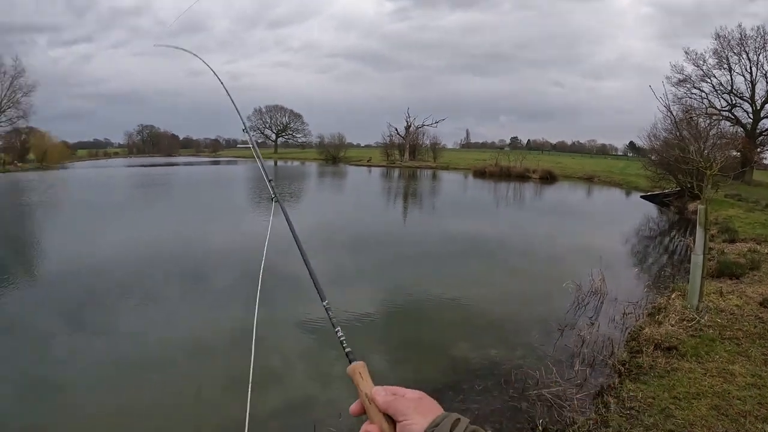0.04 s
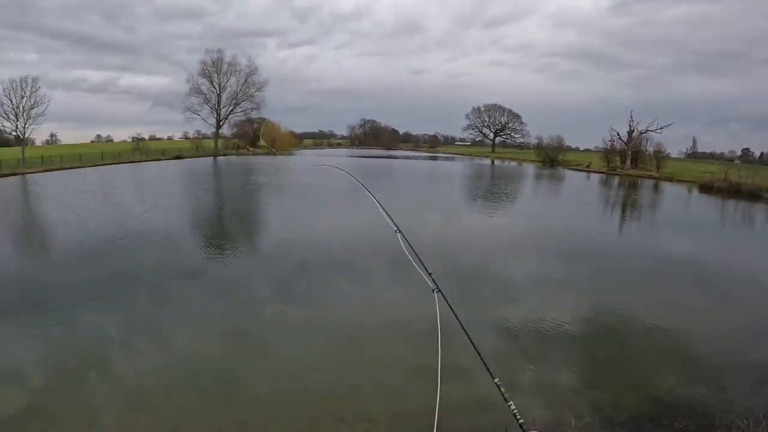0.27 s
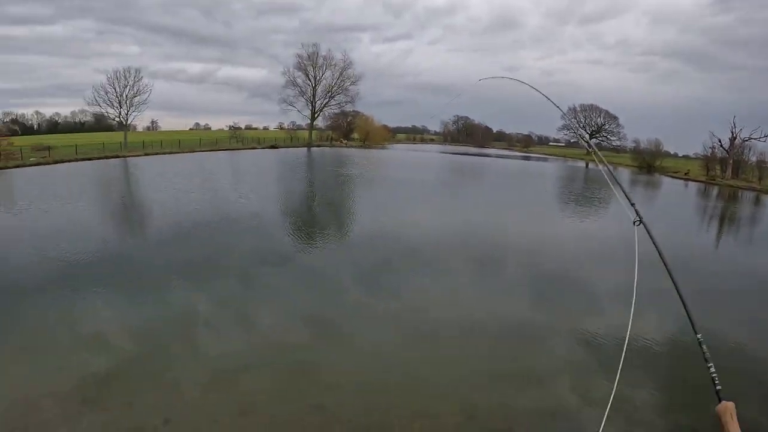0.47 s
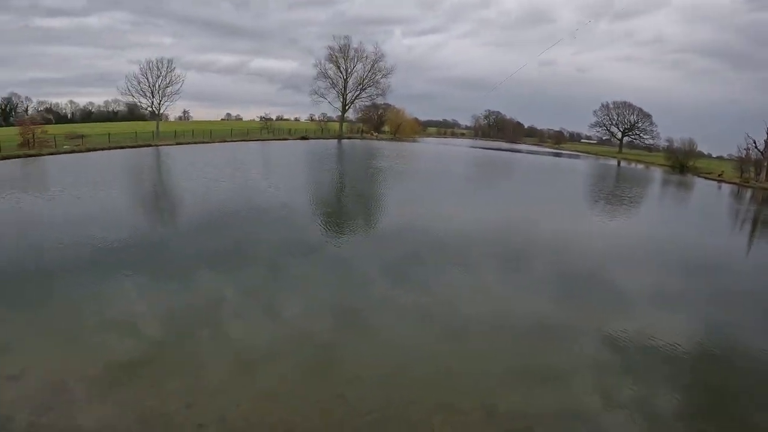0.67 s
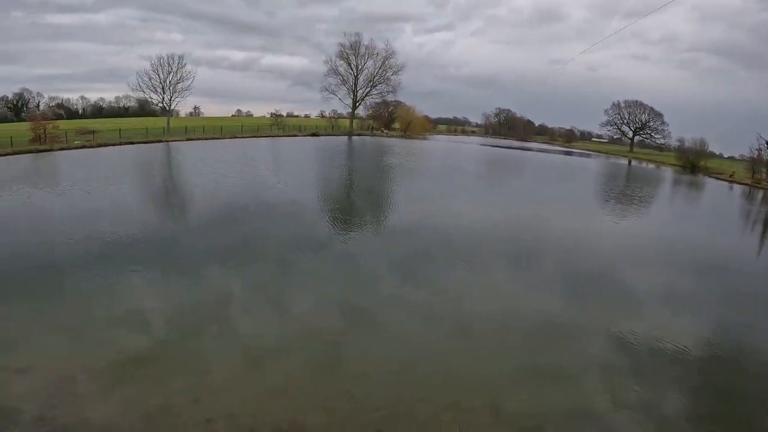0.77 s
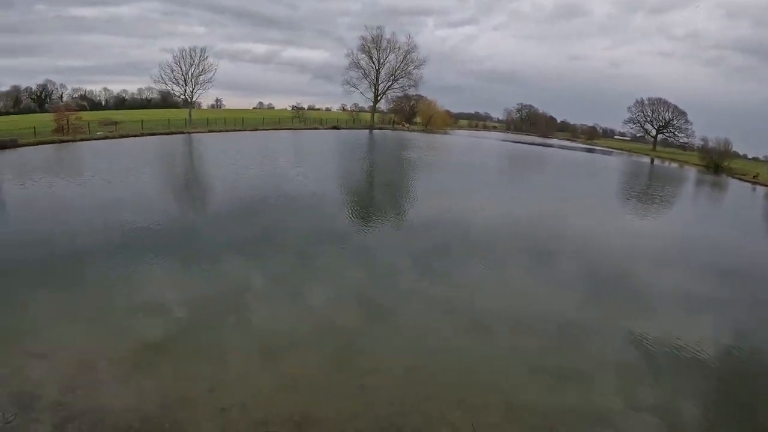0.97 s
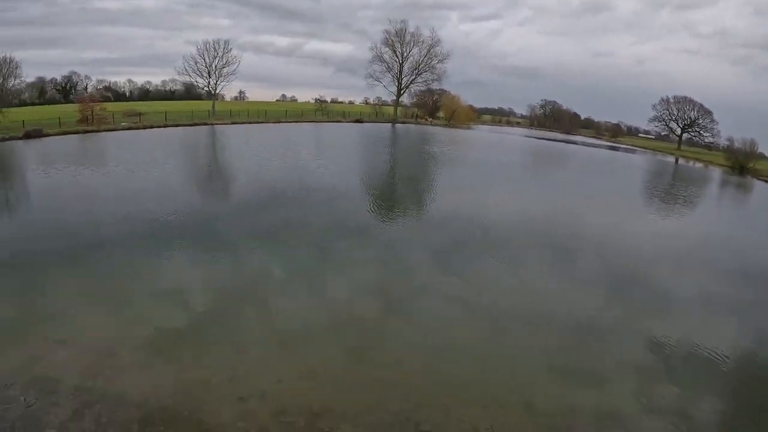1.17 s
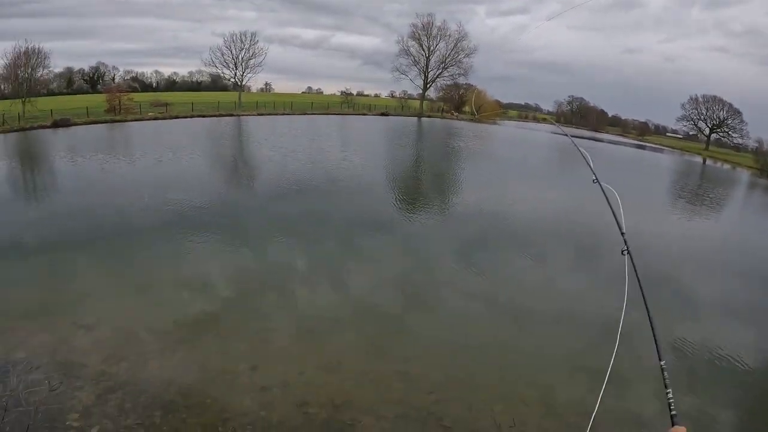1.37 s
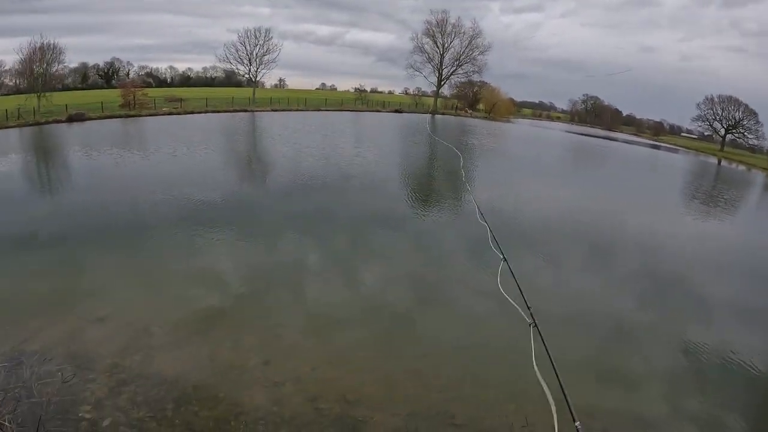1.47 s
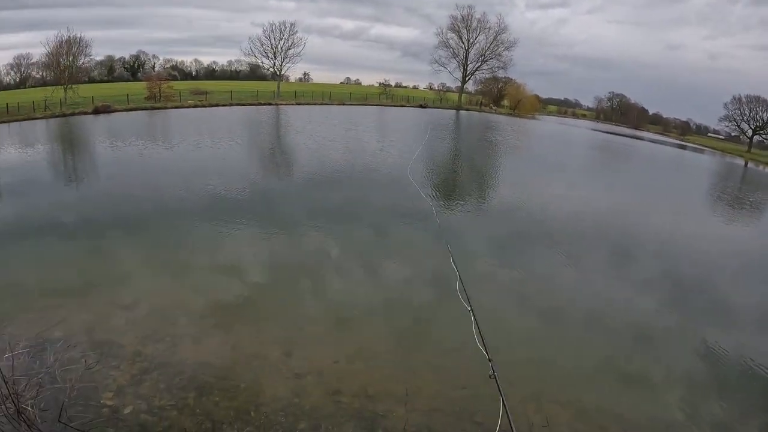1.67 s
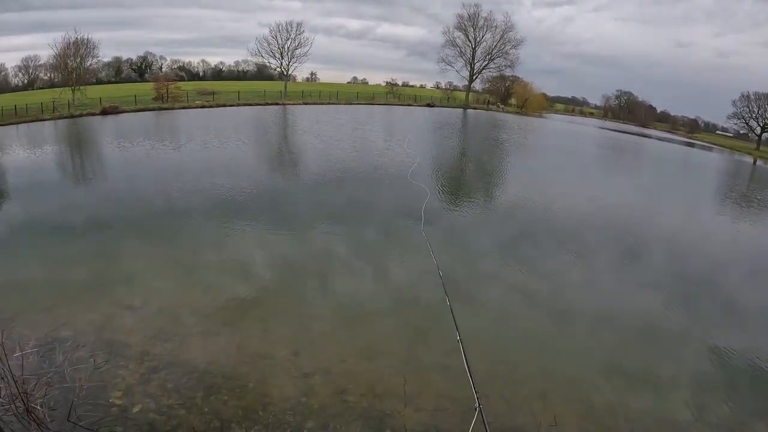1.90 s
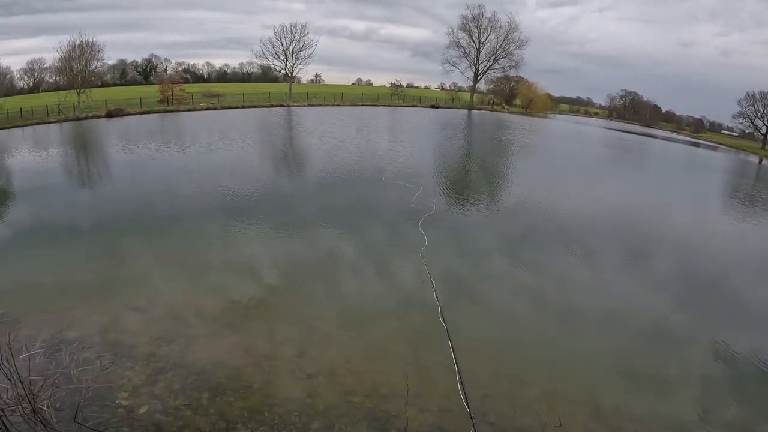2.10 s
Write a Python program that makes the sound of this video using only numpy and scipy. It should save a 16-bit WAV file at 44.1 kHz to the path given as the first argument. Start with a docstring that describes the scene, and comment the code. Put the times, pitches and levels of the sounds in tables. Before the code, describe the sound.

A thin fishing line slides through metal rod guides with a bright hiss, pauses, then shoots out with a raspier rattle. Dull clicks and wind thumps hit the close microphone outdoors, with faint chirps midway.

```python
"""Fly line slides twice through a rod's rings, hissing: smoother on the haul, slapping more on the shoot.
Friction noise and random slaps drive two-pole ring resonances; pressed rings sing alone.
Rod and sleeve swish as shaped noise; knocks on the microphone housing are decaying, sagging tones.
Wind on the port is lumpy low noise plus pressure lurches.
A bird chirps in falling sines over a faint outdoor hiss of banded noise."""
import sys
import numpy as np
from scipy import signal
from scipy.io import wavfile

SR = 44100
rng = np.random.default_rng(int(sys.argv[2]) if len(sys.argv) > 2 else 0)


def to_wav(sig):
    """Store sig (one row per channel, or 1-D mono) as 16-bit WAV at the path in sys.argv[1].

    Samples outside -1..1 are clipped; the rate is SR.
    """
    pcm = np.clip(np.atleast_2d(sig), -1, 1) * 32767
    pcm = np.round(pcm).astype(np.int16)
    wavfile.write(sys.argv[1], SR, pcm.T)  # frames by channels


def field_ratio(decibels):
    """Amplitude ratio for a level in dB (20 dB per decade); scalars and array-likes work."""
    return 10 ** (np.asarray(decibels, dtype=float) / 20)


N = 94506  # samples

# line sliding in the rings: time_s, level_db, tilt_db_per_octave
LINE_SLIDE = [(0.0, -65, -5.5), (0.15, -58.5, 3), (0.36, -58, 3.5), (0.58, -63.5, 7.5), (0.62, -68.5, -1),
              (0.86, -71.5, -2), (0.95, -81.5, -6), (1.05, -73, -7), (1.185, -74.5, 7), (1.215, -63, -11),
              (1.225, -60, 0), (1.32, -65.5, -8.5), (1.345, -57.5, -0.5), (1.54, -54, -3),
              (1.57, -58.5, -0.5), (1.65, -58.5, 4), (1.67, -53.5, 0), (1.72, -60, -4), (1.82, -57.5, 0.5),
              (1.91, -61, -5.5), (1.92, -71.5, -5), (2.05, -79, -4), (2.14, -73, -1)]
# slapping in the contact: time_s, power_share_0_to_1
SLAP_SHARE = [(1.1, .1), (1.3, .3), (1.7, .3), (1.8, .5)]
# ring resonances: centre_hz, width_hz, relative_level_db
RING_MODES = [(2600, 240, -14), (3400, 740, -0.5), (3840, 680, -4), (4740, 880, 2), (5600, 450, -0.5),
              (6130, 330, -6), (6935, 910, 0), (7600, 1800, -5.5), (8300, 370, -11), (9250, 350, -13),
              (9800, 1600, -17.5)]
# line pressing one ring, which sings: start_s, length_s, ring_hz, level_db
RING_PRESSES = [(.1, 0.42, 7040, -70), (0.143, 0.38, 4780, -64.5), (0.37, 0.16, 3400, -70.5),
                (1.37, 0.071, 3400, -60), (1.407, 0.04, 6700, -57.5), (1.431, 0.054, 8300, -60),
                (1.496, 0.025, 7600, -55), (1.572, 0.044, 5100, -56), (1.76, 0.13, 6160, -61.5),
                (1.715, 0.26, 3660, -66)]
# air past rod, arm and housing: time_s, level_db
SWISH_LEVEL = [(0, -56), (.08, -58.5), (.13, -54.5), (.44, -69), (.68, -60.5), (.85, -65), (1.0, -67.5),
               (1.05, -60), (1.15, -61.5), (1.43, -56), (1.78, -55.5), (2.14, -53.5)]
# swish spectrum: frequency_hz, relative_density_db_per_hz
SWISH_SPECTRUM = [(90, 5), (200, -0.5), (450, -1), (800, -3.5), (1300, -7.5), (2000, -13), (3000, -18),
                  (6000, -39)]
# thin sleeve rustles: start_s, length_s, level_db
SLEEVE_RUSTLES = [(0.206, .04, -73), (.58, 0.028, -71), (0.624, 0.16, -73), (1.327, 0.19, -77)]
# housing knocks: start_s, level_db, start_pitch_hz, cycles_to_die_60_db
HOUSING_KNOCKS = [(.1213, -48, 1100, 5), (.128, -40, 660, 7), (.498, -55, 2500, 7), (.5985, -42.5, 1250, 4),
                  (.6003, -51, 1350, 14), (.7184, -40.5, 880, 5.5), (.9297, -49.5, 1400, 5),
                  (1.193, -53, 8000, 6), (1.2238, -45, 4200, 4), (1.2563, -38.5, 235, 6),
                  (1.2598, -39, 440, 7), (1.585, -46, 2050, 20), (1.675, -49, 1900, 9)]
# wind on the port: time_s, level_db
GUST_LEVEL = [(0.0, -38.5), (0.3, -46), (.4, -47.5), (0.62, -39), (0.75, -41.5), (0.88, -43), (1.2, -40),
              (1.31, -39.5), (1.47, -49), (1.58, -39.5), (1.65, -53.5), (1.74, -37.5), (1.95, -40.5),
              (2.14, -42.5)]
# wind spectrum: frequency_hz, relative_density_db_per_hz
WIND_SPECTRUM = [(4, -6.5), (8, 9.5), (16, -8), (32, -10), (64, -19.5), (128, -32), (250, -43.5)]
# pressure lurches on the port: start_s, length_s, peak_db, sign
PORT_LURCHES = [(0.279, 0.016, -36, -1), (1.257, 0.017, -32.5, -1), (1.279, 0.046, -26.5, 1),
                (1.336, 0.041, -30, -1)]
# bird whistles: start_s, length_s, peak_db, start_pitch_hz
BIRD_CHIRPS = [(.698, .052, -72, 5620), (.836, .054, -69.5, 5600)]
# outdoor hiss spectrum: frequency_hz, relative_density_db_per_hz
AIR_SPECTRUM = [(300, 6), (1000, 1), (2500, -6.5), (5500, -9.5), (8000, -8.5), (11000, -9), (16000, -10.5)]

RING_TOP_HZ, TILT_PIVOT_HZ, PRESS_WIDTH_HZ = 11600, 5200, 280
RING_WANDER_DB, SLAP_EXTRA_WANDER_DB, RING_WANDER_RATE_HZ = 0.8, 2, 25
MEDIAN_SLAPS_PER_S, SLAP_SPREAD_DB = 450, 3
SLAP_CLUMP_DB, SLAP_CLUMP_RATE_HZ = 7, 45
RUSTLE_HZ, RUSTLE_WIDTH_HZ = 14400, 4000
KNOCK_LOW_RATIO, KNOCK_LOW_DB = 0.45, -10
KNOCK_SAG_AT_5_CYCLES, KNOCK_RISE_CYCLES = 0.35, 0.9  # sag: share of pitch lost
CHIRP_FALL_HZ_PER_S = 13500
AIR_DB = -70


def rms_one(x):
    """Scale to rms 1."""
    return x / np.sqrt(np.mean(x ** 2) + 1e-20)


def in_time(rows):
    """Interpolate each column over time."""
    time_s, *columns = np.transpose(rows)
    return [np.interp(np.arange(N) / SR, time_s, column) for column in columns]


def drift(rate_hz):
    """Slow noise of spread 1: two equal poles at rate_hz, run at SR / 40."""
    r = np.exp(-80 * np.pi * rate_hz / SR)
    white = rng.standard_normal(N // 40 + 2002)
    slow = signal.lfilter([1], [1, -2 * r, r * r], white)[2000:]  # drop the run-in
    return np.interp(np.arange(N) / 40, np.arange(len(slow)), rms_one(slow))


def resonance(x, hz, width_hz):
    """Two-pole peak, gain 1 on top."""
    r = np.exp(-np.pi * width_hz / SR)
    poles = [1, -2 * r * np.cos(2 * np.pi * hz / SR), r * r]
    return signal.lfilter([(1 - r * r) / 2, 0, (r * r - 1) / 2], poles, x)


def hump(start_s, length_s):
    """Smooth rise and fall of height 1."""
    return np.sin(np.pi * np.clip((np.arange(N) / SR - start_s) / length_s, 0, 1)) ** 2


def banded_noise(spectrum, patchy_db, patch_rate_hz):
    """Half-octave noise bands, each with its own level and flicker; rms 1."""
    hz, db = np.transpose(spectrum)
    edges_hz = hz[0] * 2 ** np.arange(-0.5, np.log2(hz[-1] / hz[0]) + 0.3, 0.5)
    tops_hz = np.minimum(edges_hz[1:], 0.45 * SR)
    together = drift(patch_rate_hz)
    white = rng.standard_normal((2, N + SR))
    out = 0
    for k, (low, high) in enumerate(zip(edges_hz, tops_hz)):
        sos = signal.butter(2, [low, high], "band", fs=SR, output="sos")
        band = signal.sosfilt(sos, white[k % 2])[SR:]
        level_db = np.interp(np.log(low * high) / 2, np.log(hz), db)
        flicker_db = patchy_db * (0.16 * together + drift(patch_rate_hz))
        out = out + field_ratio(level_db + flicker_db) * band
    return rms_one(out)


def line_slaps():
    """Clumped random impulses of either sign and uneven size; rms 1."""
    size_db = SLAP_SPREAD_DB * np.minimum(rng.exponential(1, N), 5)
    sizes = field_ratio(size_db) * rng.choice([-1, 1], N)
    slaps_per_s = MEDIAN_SLAPS_PER_S * field_ratio(SLAP_CLUMP_DB * drift(SLAP_CLUMP_RATE_HZ))
    return rms_one(sizes * (rng.random(N) < slaps_per_s / SR))


def line_in_rings():
    """Friction noise and slaps excite each ring; more slapping makes ring levels wander more."""
    level_db, tilt = in_time(LINE_SLIDE)
    slap_share = np.clip(in_time(SLAP_SHARE)[0], 0, 1)
    slaps = line_slaps()
    out = 0
    for hz, width_hz, db in RING_MODES:
        friction = rng.standard_normal(N)
        rub = np.sqrt(1 - slap_share) * friction + np.sqrt(slap_share) * slaps
        spread_db = RING_WANDER_DB + SLAP_EXTRA_WANDER_DB * slap_share
        wander_db = spread_db * drift(RING_WANDER_RATE_HZ)
        ringing = resonance(resonance(rub, hz, width_hz), hz, 2.0 * width_hz)
        tilt_db = tilt * np.log2(hz / TILT_PIVOT_HZ)
        out = out + field_ratio(db + tilt_db + wander_db) * rms_one(ringing)
    lowpass = signal.butter(4, RING_TOP_HZ, fs=SR, output="sos")
    return field_ratio(level_db) * rms_one(signal.sosfilt(lowpass, out))


def pressed_rings():
    """Noise through one narrow resonance while the line presses that ring."""
    noise = rng.standard_normal(N)
    out = np.zeros(N)
    for start_s, length_s, hz, db in RING_PRESSES:
        singing = rms_one(resonance(noise, hz, PRESS_WIDTH_HZ))
        out += field_ratio(db) * hump(start_s, length_s) ** 0.5 * singing
    return out


def swish():
    """Air past rod, arm and housing: flickering banded noise that follows the motion."""
    level_db, = in_time(SWISH_LEVEL)
    return field_ratio(level_db) * banded_noise(SWISH_SPECTRUM, patchy_db=1.5, patch_rate_hz=14.0)


def sleeve():
    """Grainy noise through two equal high resonances, in short rustles."""
    grain = rng.standard_normal(N) * field_ratio(2.0 * drift(80))
    once = resonance(grain, RUSTLE_HZ, RUSTLE_WIDTH_HZ)
    rustle = rms_one(resonance(once, RUSTLE_HZ, RUSTLE_WIDTH_HZ))
    level = sum(field_ratio(db) * hump(start_s, length_s) ** 0.5 for start_s, length_s, db in SLEEVE_RUSTLES)
    return level * rustle


def knocks():
    """Tones swell for about a cycle, then die as pitch sags with the spreading contact; a lower tone rides along."""
    out = np.zeros(N + SR)
    t = np.arange(SR // 10) / SR
    for start_s, db, hz, cycles in HOUSING_KNOCKS:
        turns = hz * t
        sag = KNOCK_SAG_AT_5_CYCLES * 5 / cycles  # shorter knocks sag more
        phase = 2 * np.pi * ((1 - sag) * turns + sag * (1 - np.exp(-turns)))
        rise = np.sin(np.pi / 2 * np.minimum(turns / KNOCK_RISE_CYCLES, 1))
        decay = field_ratio(-60 * (np.maximum(turns - KNOCK_RISE_CYCLES, 0) / cycles))
        tones = np.sin(phase) - field_ratio(KNOCK_LOW_DB) * np.sin(KNOCK_LOW_RATIO * phase)
        i = int(start_s * SR)
        out[i:i + len(t)] -= field_ratio(db) * rise * decay * tones
    return out[:N]


def wind():
    """Lumpy low noise follows the gusts; single pressure humps add lurches."""
    gust_db, = in_time(GUST_LEVEL)
    lurches = sum(np.sign(sign) * field_ratio(db) * hump(start_s, length_s)
                  for start_s, length_s, db, sign in PORT_LURCHES)
    return field_ratio(gust_db) * banded_noise(WIND_SPECTRUM, patchy_db=2.0, patch_rate_hz=12.3) + lurches


def bird():
    """Short sine whistles, pitch falling linearly."""
    out = np.zeros(N)
    for start_s, length_s, db, hz in BIRD_CHIRPS:
        t = np.arange(N) / SR - start_s
        cycles = (hz - CHIRP_FALL_HZ_PER_S * t / 2) * t
        out += field_ratio(db) * hump(start_s, length_s) ** 0.5 * np.sin(2 * np.pi * cycles)
    return out


def outdoor_hiss():
    """Faint, slowly flickering banded noise."""
    return field_ratio(AIR_DB) * banded_noise(AIR_SPECTRUM, patchy_db=2.5, patch_rate_hz=4.1)


def scene():
    """Sum all sources into one channel."""
    line = line_in_rings() + pressed_rings()
    handling = swish() + sleeve() + knocks()
    background = wind() + bird() + outdoor_hiss()
    return (line + handling + background)[None]


def top_cut(x):
    """Nothing passes above the cut-off."""
    return signal.sosfilt(signal.butter(12, 15990, fs=SR, output="sos"), x)


def record(dry):
    """Turn the finished mix into the output."""
    return top_cut(dry)


dry = scene()
out = record(dry)
to_wav(out)
```